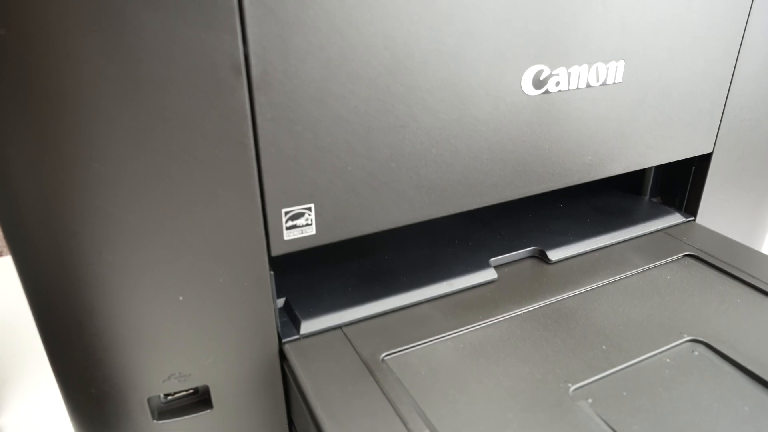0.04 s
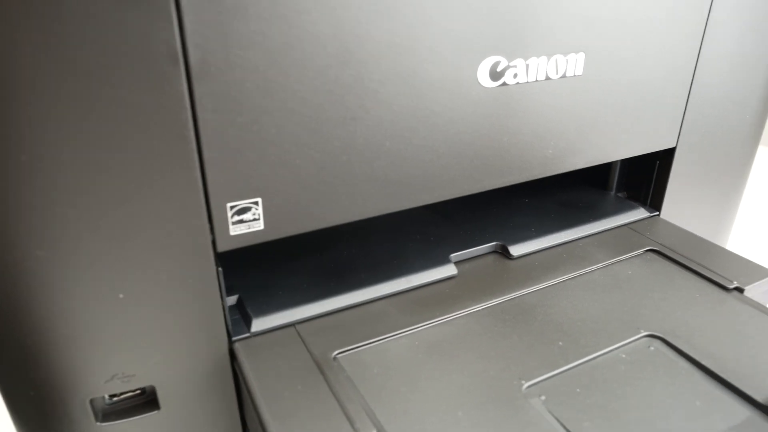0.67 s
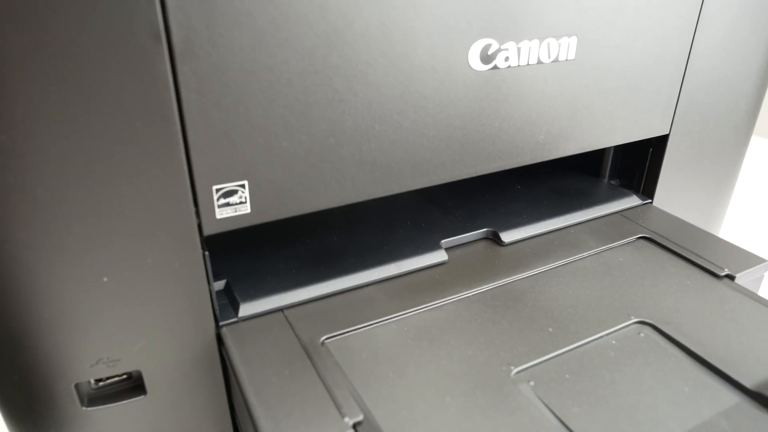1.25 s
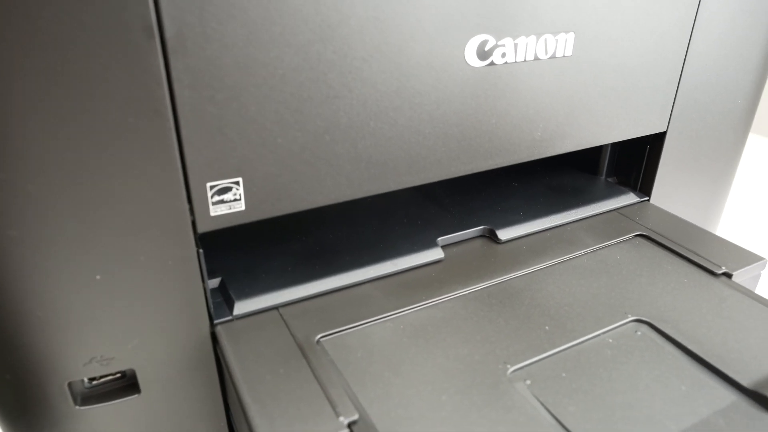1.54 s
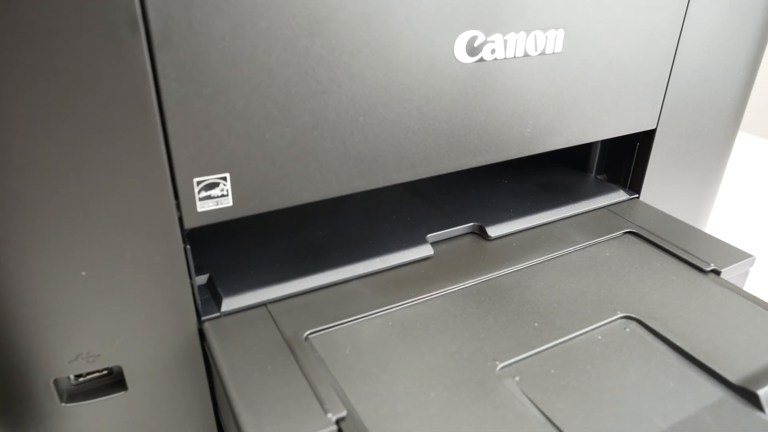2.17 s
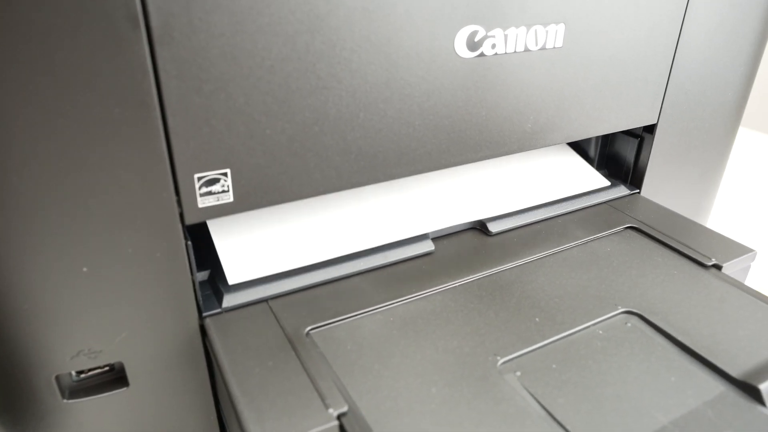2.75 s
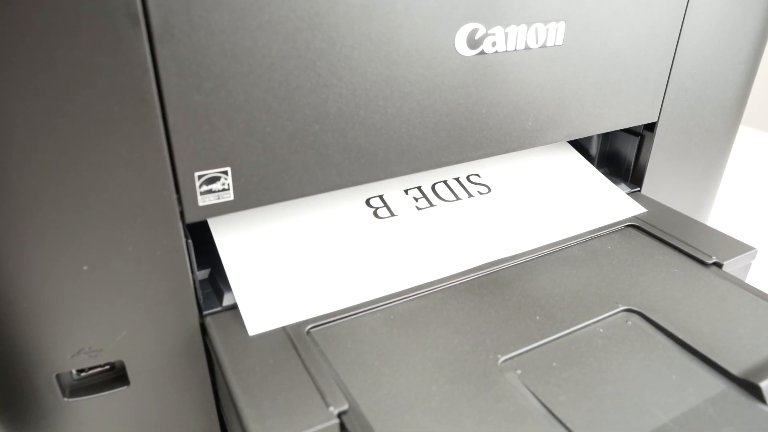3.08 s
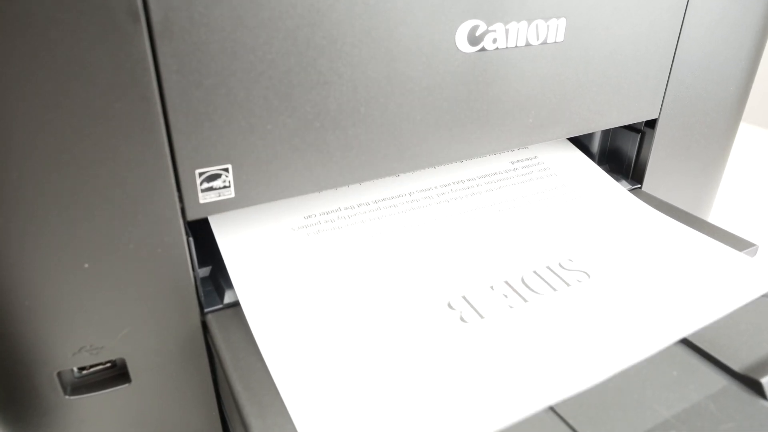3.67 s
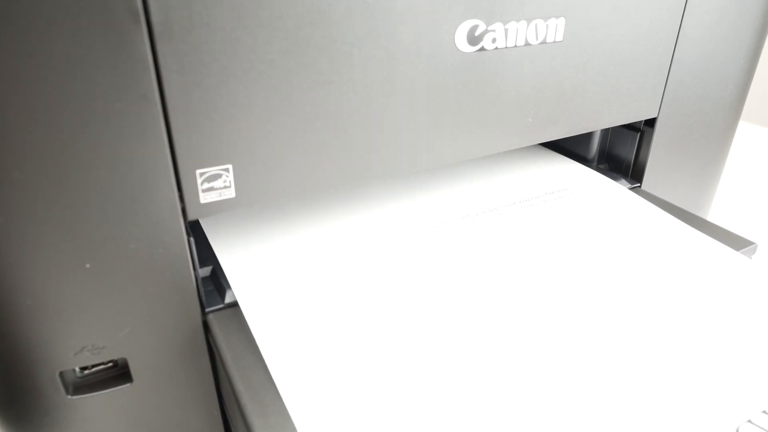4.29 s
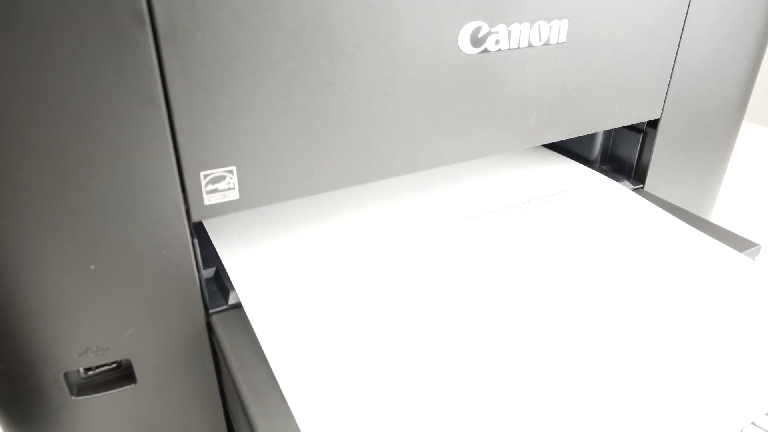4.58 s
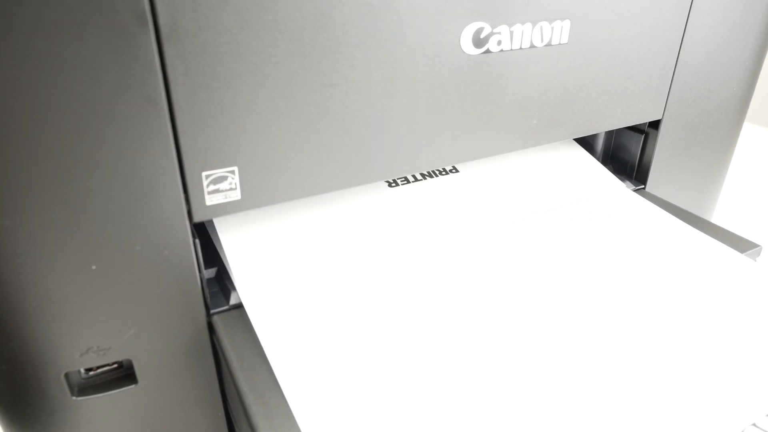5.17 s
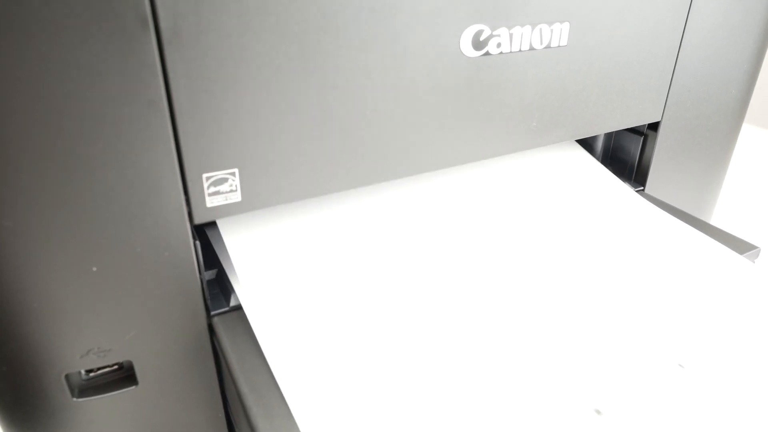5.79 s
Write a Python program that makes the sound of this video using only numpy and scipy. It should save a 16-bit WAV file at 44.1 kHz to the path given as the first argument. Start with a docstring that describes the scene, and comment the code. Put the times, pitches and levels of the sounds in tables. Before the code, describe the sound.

An inkjet printer feeds a page in short rattling, whining steps, with sharp plastic clacks and the print head sliding to and fro.

```python
"""In a small room, an inkjet printer prints a page, heard in mono from just in front of its output tray.
Over a low, steady rumble, the print head slides to and fro with a thin whine and rocks the machine
at each turn. The feed motor pushes the sheet on in short steps: the gears take up their slack with a
thud, then rattle and whine in the plastic casing while paper scrapes and levers clack.
The sheet squeaks once on the tray lip, and a last long run carries it out."""
import sys
import numpy as np
from scipy import signal
from scipy.fft import rfft, irfft
from scipy.io import wavfile

SR = 44100
rng = np.random.default_rng(int(sys.argv[2]) if len(sys.argv) > 2 else 0)


def file_out(sig):
    """Save sig as 16-bit WAV at sys.argv[1]."""
    # one column per channel
    cols = np.atleast_2d(sig).T
    # limit, then scale
    lim = np.clip(cols, -1, 1)
    pcm = np.round(lim * 32767).astype(np.int16)
    wavfile.write(sys.argv[1], SR, pcm)


N = 266408
TIME = np.arange(N) / SR

# The tone of the room's rumble. Each row: frequency in Hz, relative level in dB.
ROOM_COLOUR = [(15, -43), (25, -17), (37, -7), (55, -6.5), (68, -10.5), (86, -22), (152, -16.5), (215, -23),
               (457, -27), (582, -31), (919, -33.5), (2420, -40), (15500, -49)]
# The tone of the sliding print head. Each row: frequency in Hz, relative level in dB.
SLIDE_COLOUR = [(30, -2.5), (100, -8), (150, 3.5), (350, -6), (850, 1), (1150, -9.5), (2400, -11),
                (3200, -14.5), (5500, -17), (7000, -15.5), (9000, -19), (11200, -20), (15500, -29.5)]
# The tone of the paper feed and its knocks. Each row: frequency in Hz, relative level in dB.
FEED_COLOUR = [(30, -13), (90, -8.5), (140, -4.5), (350, -1.5), (800, 1.5), (1500, -0.5), (2300, -1.5),
               (2900, -7.5), (4500, -11.5), (7000, -14), (9700, -19), (11000, -19.5), (13000, -25),
               (16000, -28)]
# Where the casing's panels ring. Each row: frequency in Hz, width in Hz, boost in dB.
PANEL_RINGS = [(144.7, 18, 12.5), (181.5, 13, 12), (242.5, 26, 4), (315, 39, 7), (423.4, 15.4, 7.5),
               (467, 65, 7.5), (556, 8.1, 3.5), (728, 26, 3.5), (900, 110, -0.5), (1037, 205, 3.5),
               (1530, 170, 2), (1960, 36, -0.5), (2256, 290, 3), (3450, 140, 3.5)]
# The print head sets off or turns round. Each row: time in seconds, level of the rocking in dB.
HEAD_TURNS = [(1.836, -45), (2.24, -55), (2.519, -50), (2.779, -44), (3.07, -47), (3.36, -49),
              (3.85, -46.5), (4.14, -49), (4.482, -44), (4.878, -44), (5.17, -43)]
# The tones of the print head's motor. Each row: pitch in Hz, relative level in dB.
HEAD_TONES = [(737, -1), (900, -3), (1470, 0), (2204, -9), (4607, -14), (6896, -21)]
# Runs long enough for the exit rollers to sing.
# Each row: start in seconds, stop in seconds, level in dB, boost of the high tones in dB.
EXIT_RUNS = [(1.45, 1.81, -47, -9), (5.41, 5.62, -45, -7), (5.63, 6.09, -36.5, 1)]
# The tones of the exit rollers' gears. Each row: pitch in Hz, relative level in dB.
EXIT_TONES = [(301, -12), (565, -9), (1001, -8), (1045, -8), (1125, 0), (2202, -6), (2252, -3), (2815, -10),
              (4221, -22)]
# Clacks of levers and the sheet's edge.
# Each row: time in seconds, level in dB, boost of the low thud in dB, boost of the high snap in dB.
CLACKS = [(0.03, -51, 15, -3), (.903, -21, 0, -17), (0.931, -28, 6, -7), (0.952, -43, 10, 20),
          (1.835, -48.5, 18, -3.5), (2.989, -23, 1, 7.5), (3.195, -30, 7, 1), (3.244, -15, -0.5, -3),
          (3.252, -19, -15, 1), (3.63, -20, 3, -2), (3.71, -27.5, 9.5, -6), (3.741, -24, 3, -2.5),
          (4.114, -29.5, -2, -1), (4.217, -47.5, 22, -13), (5.08, -27, -10, -11), (5.134, -28.5, -14, 9.5),
          (5.372, -29, 7, 3.5), (5.636, -27.5, 6, -4)]
# The tones of the feed gears' teeth at full speed. Each row: pitch in Hz, relative level in dB.
GEAR_TONES = [(980, -7), (1078, -8), (1351, -5), (1750, -11), (2024, 0), (2153, -6), (2250, -8),
              (2702, -15), (3042, -15)]
# The steps that move the paper. Each row: start in seconds, stop in seconds, rattle level in dB,
# rumble in dB compared with the rattle, gear whine level in dB, opening knock level in dB.
FEED_STEPS = [(0.87, 0.988, -35.5, 4, -56, -44), (1.404, 1.628, -30, -3.5, -42, -42),
              (2.053, 2.226, -30.5, 0, -42, -37), (2.378, 2.5, -32.5, 0, -60, -33.5),
              (2.666, 2.813, -31, -1, -58, -34.5), (2.946, 3.074, -28.5, 1, -43, -36),
              (3.206, 3.377, -30, 0, -42, -48), (3.525, 3.675, -28, -2, -34, -39),
              (3.691, 3.764, -31, 5, -43, -37), (3.755, 3.978, -29.5, -4.5, -34.5, -44),
              (4.023, 4.17, -34, 4, -46, -45), (4.368, 4.496, -30.5, 0, -52, -34.5),
              (4.77, 4.896, -32.5, 0, -60, -34.5), (5.061, 5.18, -28.5, -2, -37.5, -35),
              (5.35, 5.532, -30.5, -10.5, -39, -46), (5.615, 5.987, -32, -5, -49, -39)]


def amp(db):
    """Turn decibels into a number to multiply a sound by."""
    return 10 ** (np.asarray(db) / 20)


def unit(x):
    """Scale a signal to an average power of one."""
    return x / np.sqrt(np.mean(x ** 2))


def wander(rate):
    """A random curve of typical size one that changes course about rate times a second."""
    return unit(np.interp(TIME * rate, np.arange(4096), rng.standard_normal(4096)))


def colour(x, points, rings=(), size=16384):
    """Shape a sound's tone with a broad curve and the ringing peaks that stand out of it."""
    hz = np.maximum(np.arange(size // 2 + 1) * SR / size, 1)
    point_hz, point_db = np.transpose(points)
    db = np.interp(np.log(hz), np.log(point_hz), point_db)
    for centre, width, boost in rings:
        db = db + boost / (1 + (2 * (hz - centre) / width) ** 2)
    # Build the filter so that it rings after a hit, never before it.
    cepstrum = irfft(np.log(amp(db)))
    cepstrum[1:size // 2] *= 2
    cepstrum[size // 2 + 1:] = 0
    response = irfft(np.exp(rfft(cepstrum)))
    return signal.fftconvolve(x, response / np.linalg.norm(response))[:N]


def split(x, low_hz=600, high_hz=4000):
    """Split a sound into bass, middle and treble parts that add up to it."""
    bass, below_treble = (signal.sosfiltfilt(signal.butter(2, hz, fs=SR, output="sos"), x)
                          for hz in (low_hz, high_hz))
    return bass, below_treble - bass, x - below_treble


def move(start, stop, ramp_s, brake_s, jerk=0):
    """The speed of one move, from 0 to 1: jerk into motion, speed up, hold, slow down."""
    age = TIME - start
    rise = np.minimum(age / 0.0037, jerk + (1 - jerk) * age / ramp_s)
    return np.clip(np.minimum(rise, (stop - TIME) / brake_s), 0, 1)


def impacts(rate, scatter_db):
    """Tiny random hits of uneven strength, about rate of them a second."""
    hits = (rng.random(N) < rate / SR) * rng.choice([-1, 1], N)
    strength = amp(scatter_db * np.clip(rng.standard_normal(N), -2, 2))
    return unit(hits * strength)


def whine(tones, flutter, rough_db, sag=0):
    """Gear tones: uneven teeth shake each one's pitch and level, and sag lowers the pitch."""
    out = 0
    for hz, db in tones:
        cycles = np.cumsum(hz * (1 - sag + flutter * wander(120))) / SR
        out = out + amp(db + rough_db * wander(70)) * np.sin(2 * np.pi * cycles)
    return unit(out)


def knocks(rows, tick, rise_s, fade_s, size=8192):
    """Each knock is a tick and a brief chatter of loose plastic that make the casing ring."""
    force, age = np.zeros(N + size), np.arange(size) / SR
    for time, db, thud_db, snap_db in rows:
        blow = rng.standard_normal(size) * amp(-60 * age / fade_s) * (1 - np.exp(-age / rise_s))
        blow[0] = tick
        bass, middle, treble = split(np.roll(blow, size // 2), low_hz=360)
        first = int(time * SR)
        force[first:first + size] += amp(db) * (amp(thud_db) * bass + middle + amp(snap_db) * treble)
    return colour(force[size // 2:][:N], FEED_COLOUR, PANEL_RINGS)


def room_rumble(db=-62):
    """The low, steady rumble behind everything."""
    return amp(db) * colour(rng.standard_normal(N), ROOM_COLOUR)


def room_echo(x, echo_db, fades_s=(0.48, 0.46, 0.38), build_s=0.0056, size=20000, count=17):
    """Add a small room's echo, which drifts from one pattern to the next; its treble fades first."""
    age = np.arange(size) / SR
    bands = split(rng.standard_normal((count, size)))
    tails = sum(band * amp(-60 * age / fade_s) for band, fade_s in zip(bands, fades_s))
    tails *= 1 - np.exp(-age / build_s)
    drift, echo = np.linspace(0, count - 1, N), np.zeros(N + size)
    for k, tail in enumerate(tails):
        near = np.flatnonzero(abs(drift - k) < 1)
        blend = np.cos(np.pi / 2 * (drift[near] - k))
        part = signal.fftconvolve(x[near] * blend, tail / np.linalg.norm(tail))
        echo[near[0]:near[0] + len(part)] += part
    return (x + amp(echo_db) * echo[:N]) / np.hypot(1, amp(echo_db))


def head_speed(park_s=5.62):
    """The print head's speed, from 0 to 1: one pass from each turn to the next, until it parks."""
    times = [time for time, _ in HEAD_TURNS] + [park_s]
    return sum(move(start, stop, ramp_s=0.053, brake_s=0.013, jerk=0.22)
               for start, stop in zip(times, times[1:]))


def head_motor(start_s=1.955):
    """The belt motor's whine comes and goes while the head is at speed, strongest on the first pass."""
    cruise = amp(-54 + 2.5 * wander(13)) * head_speed() ** 3 * (TIME > start_s)
    first_pass = amp(-49.5) * move(start_s, stop=2.2, ramp_s=0.0092, brake_s=0.11)
    return np.maximum(cruise, first_pass) * whine(HEAD_TONES, flutter=0.015, rough_db=4)


def head_slide():
    """The print head rubs along its rail, louder the faster it goes."""
    rubbing = amp(-48.5) * head_speed() * rng.standard_normal(N) * amp(1.9 * wander(40))
    return colour(rubbing, SLIDE_COLOUR, PANEL_RINGS)


def rocking(frame_hz=49, tray_hz=83, tray_db=-5, fade_s=0.42):
    """Each turn of the print head shakes the whole machine on its feet."""
    out = 0
    for time, db in HEAD_TURNS:
        age = np.maximum(TIME - time, 0)
        angle = 2 * np.pi * age * (1 + 0.04 * rng.standard_normal())  # each turn is tuned a bit apart
        shake = np.sin(frame_hz * angle) + amp(tray_db) * np.sin(tray_hz * angle)
        out = out + amp(db - 60 * age / fade_s) * shake
    return out


def paper_squeak(hz=5050, width_hz=220, db=-45):
    """The sheet's edge rubs the plastic tray lip once: quick slips ring one high note."""
    slips = impacts(rate=900, scatter_db=3)
    ring = signal.lfilter(*signal.iirpeak(hz, hz / width_hz, fs=SR), slips)
    return amp(db) * move(start=2.738, stop=2.795, ramp_s=0.0095, brake_s=0.0088) * unit(ring)


def exit_rollers():
    """The exit gears sing through the longer runs; their high tones grow when they pull the sheet."""
    tones = whine(EXIT_TONES, flutter=0.004, rough_db=3)
    low = split(tones, low_hz=1590)[0]
    high = tones - low
    return sum(amp(db) * move(start, stop, ramp_s=0.032, brake_s=0.26) * (low + amp(high_db) * high)
               for start, stop, db, high_db in EXIT_RUNS)


def lever_clacks():
    """Levers and the sheet's edge strike hard and sharp."""
    return knocks(CLACKS, tick=6.3, rise_s=0.0014, fade_s=0.061)


def slack_thuds(delay_s=0.001, thud_db=17.5, snap_db=-3):
    """The gears take up their slack with one soft, dull knock as each step starts."""
    rows = [(start + delay_s, db, thud_db, snap_db) for start, *_, db in FEED_STEPS]
    return knocks(rows, tick=2.0, rise_s=0.0029, fade_s=0.069)


def feed_speed(start, stop, jerk):
    """The feed motor's speed, from 0 to 1: every step speeds up and slows down alike."""
    return move(start, stop, ramp_s=0.05, brake_s=0.06, jerk=jerk)


def feed_whine():
    """The feed gears' teeth sing loudest at full speed and drop a little in pitch when slower."""
    loudness, shaft_speed = np.zeros((2, N))
    for start, stop, _, _, db, _ in FEED_STEPS:
        speed = feed_speed(start, stop, jerk=0.235)
        loudness += amp(db) * speed ** 2
        shaft_speed += speed
    return loudness * whine(GEAR_TONES, flutter=0.00505, rough_db=3.5, sag=0.025 * (1 - shaft_speed))


def paper_feed(slack=0.31, hiss_db=0.54):
    """Gear teeth knock in the casing: first a rumble, then rattle, and paper hiss once the slack goes."""
    rumble, rattle, hiss = np.zeros((3, N))
    for start, stop, db, rumble_db, *_ in FEED_STEPS:
        speed = feed_speed(start, stop, jerk=0.17)
        sheet_speed = np.clip((speed - slack) / (1 - slack), 0, 1)
        rumble += amp(db + rumble_db) * speed ** 0.27
        rattle += amp(db) * speed ** 1.09
        hiss += amp(db + hiss_db) * sheet_speed ** 0.52
    contacts = unit(impacts(rate=1300, scatter_db=2.5) + amp(3.0) * rng.standard_normal(N))
    bass, middle, treble = split(contacts * amp(0.99 * wander(110)))
    return colour(bass * rumble + middle * rattle + treble * hiss, FEED_COLOUR, PANEL_RINGS)


def scene():
    """The printer in its room over a low rumble, the same in both channels."""
    mechanism = paper_feed() + slack_thuds() + lever_clacks() + paper_squeak() + head_slide()
    casing = room_echo(mechanism, echo_db=-5) + rocking()
    # The gear and motor whines get less echo, so their tones stay steady.
    whines = room_echo(feed_whine() + exit_rollers() + head_motor(), echo_db=-11)
    return np.tile(casing + whines + room_rumble(), (2, 1))


def record(dry, cutoff_hz=15700):
    """Cut off the highest treble steeply."""
    return signal.sosfilt(signal.ellip(12, 0.1, 80, cutoff_hz, fs=SR, output="sos"), dry)


dry = scene()
out = record(dry)
file_out(out)
```